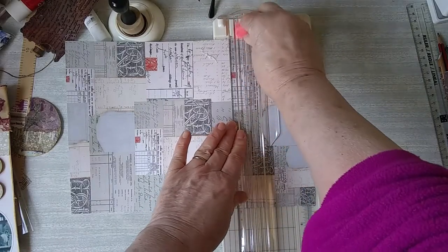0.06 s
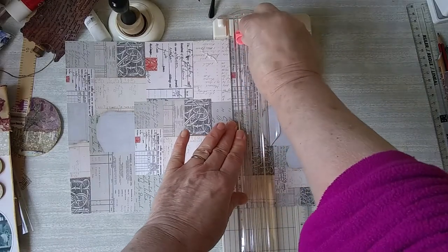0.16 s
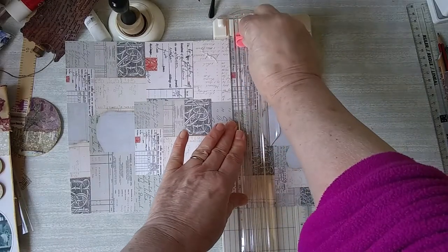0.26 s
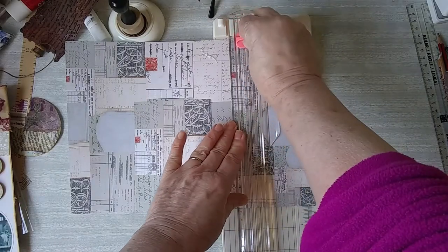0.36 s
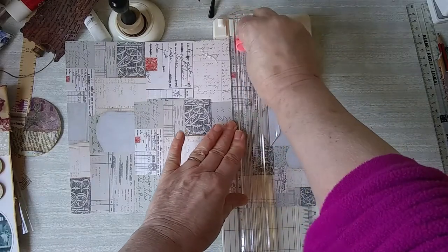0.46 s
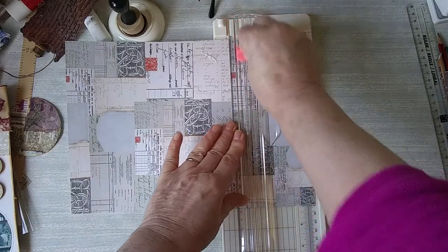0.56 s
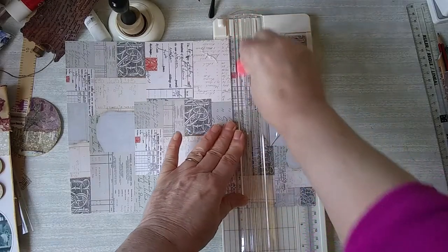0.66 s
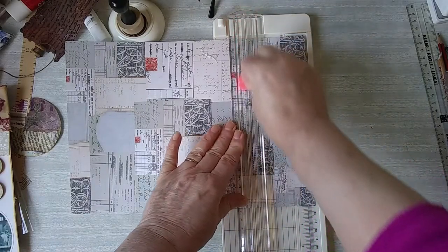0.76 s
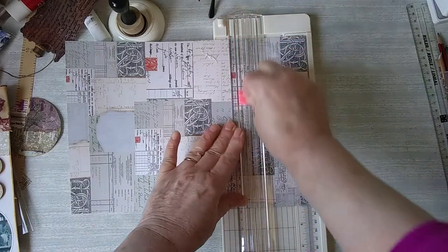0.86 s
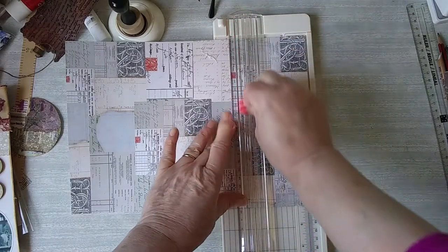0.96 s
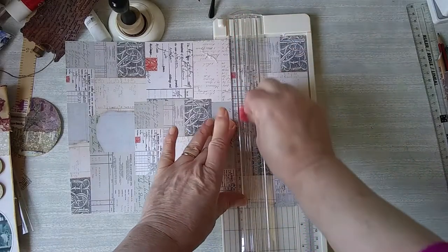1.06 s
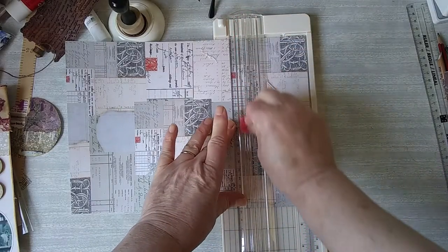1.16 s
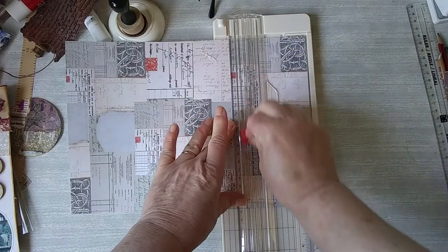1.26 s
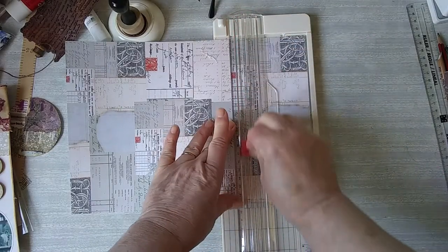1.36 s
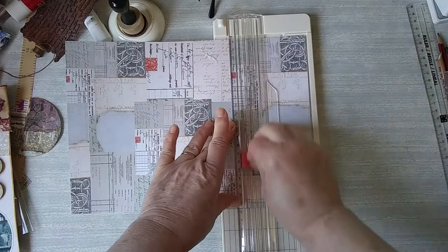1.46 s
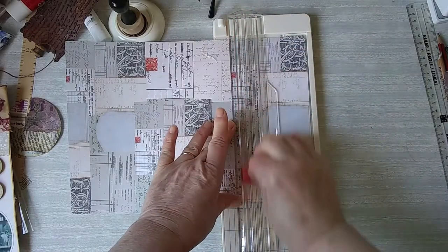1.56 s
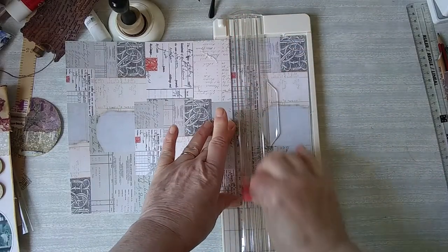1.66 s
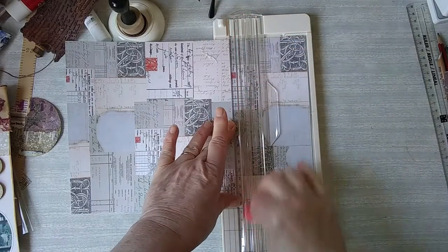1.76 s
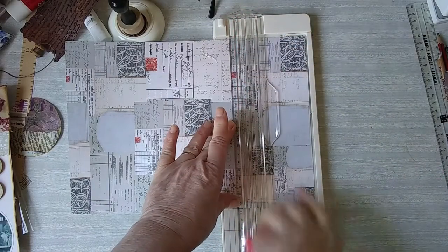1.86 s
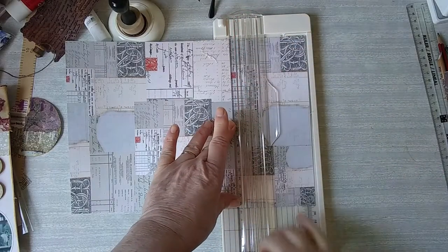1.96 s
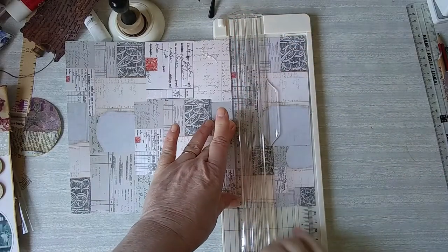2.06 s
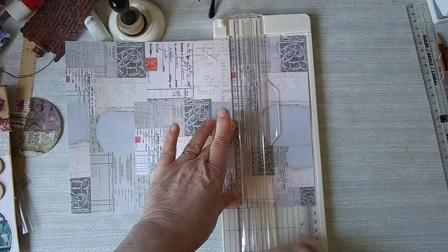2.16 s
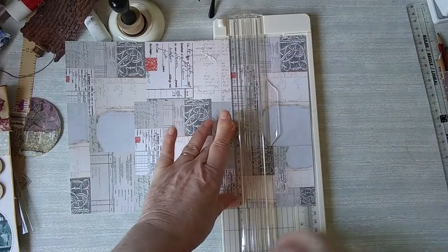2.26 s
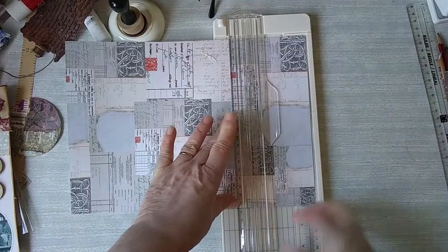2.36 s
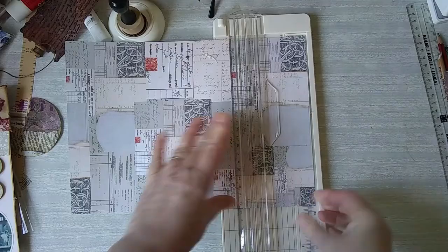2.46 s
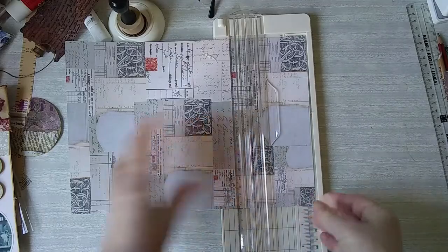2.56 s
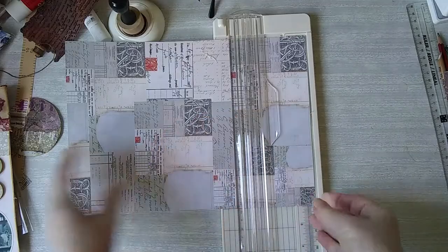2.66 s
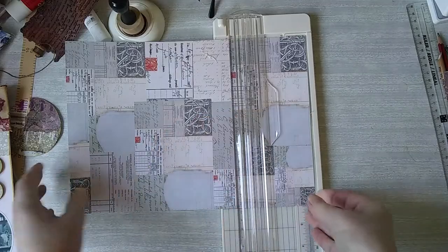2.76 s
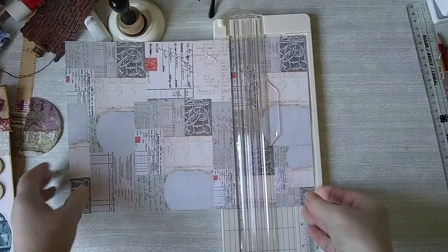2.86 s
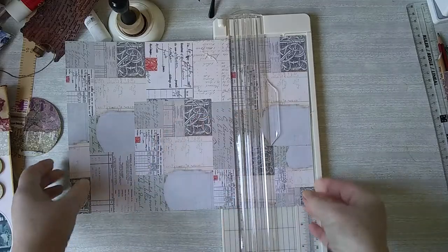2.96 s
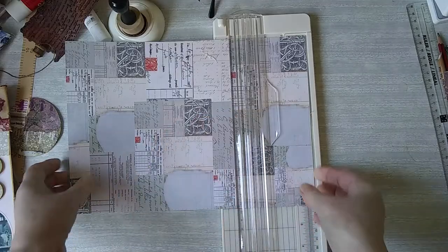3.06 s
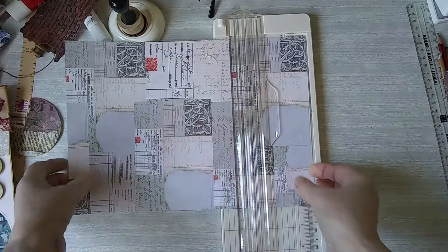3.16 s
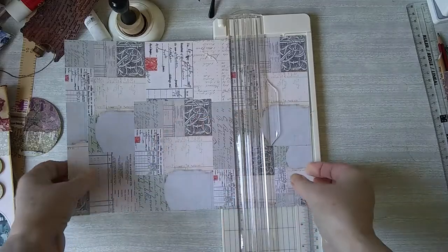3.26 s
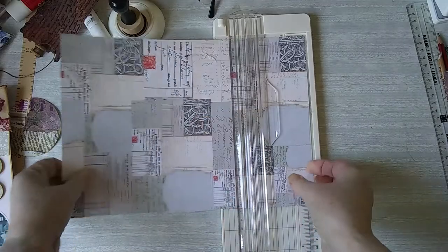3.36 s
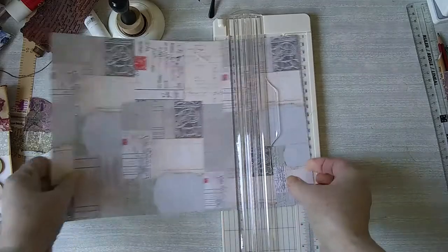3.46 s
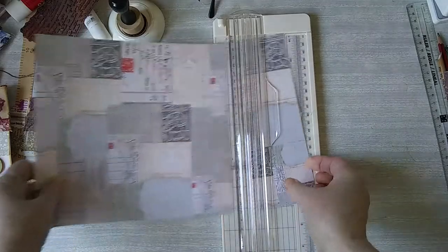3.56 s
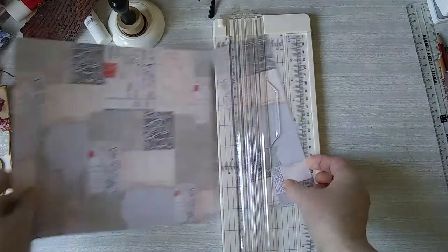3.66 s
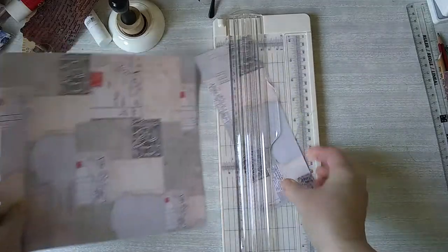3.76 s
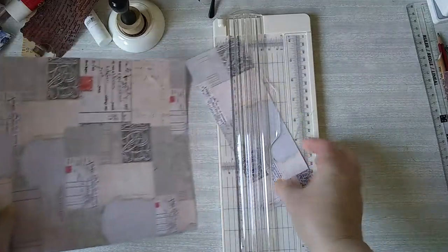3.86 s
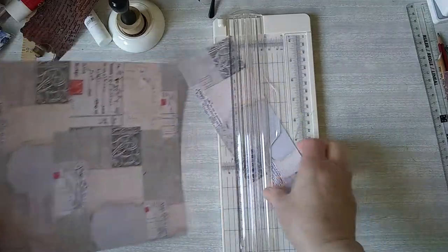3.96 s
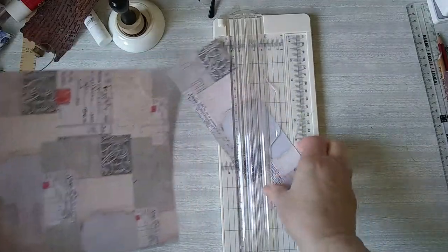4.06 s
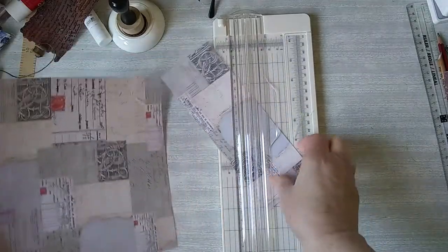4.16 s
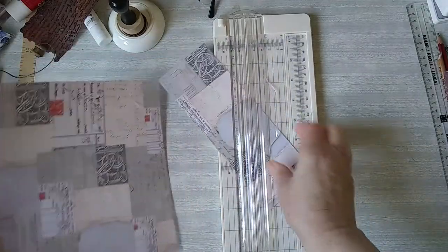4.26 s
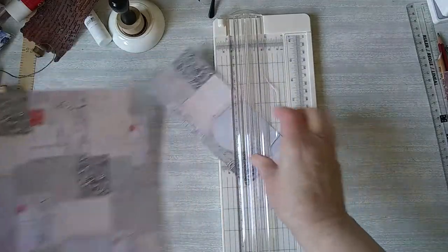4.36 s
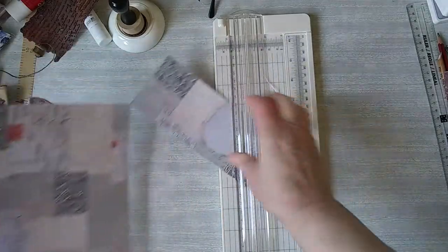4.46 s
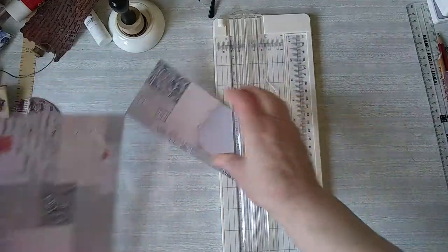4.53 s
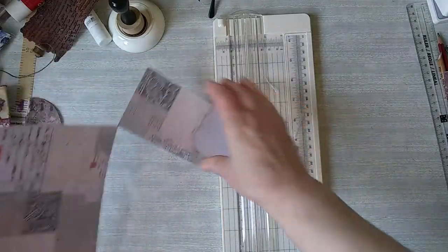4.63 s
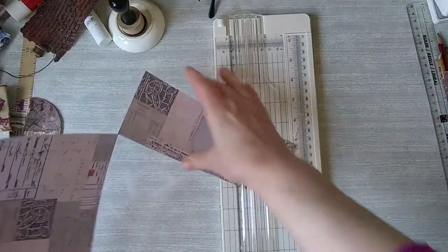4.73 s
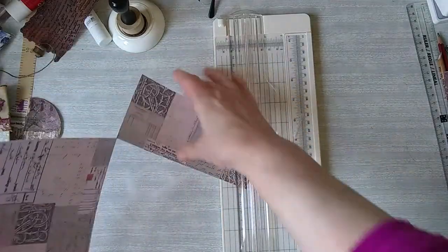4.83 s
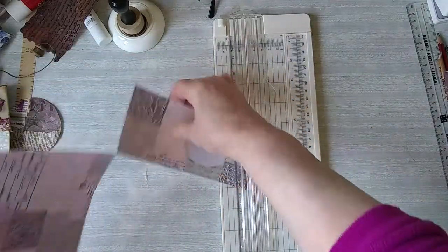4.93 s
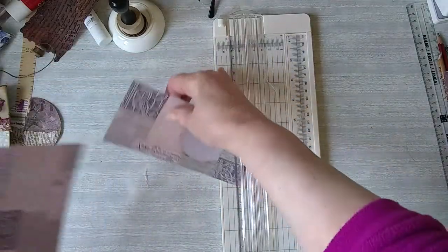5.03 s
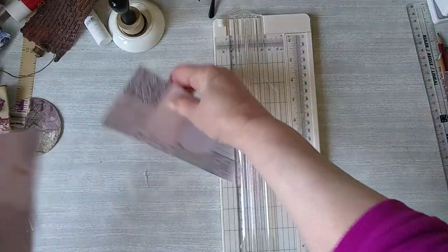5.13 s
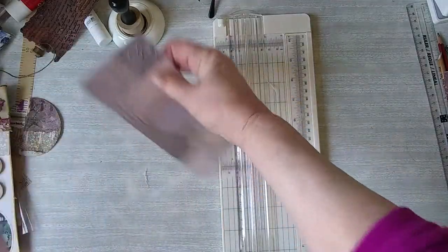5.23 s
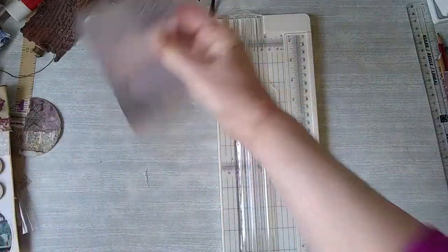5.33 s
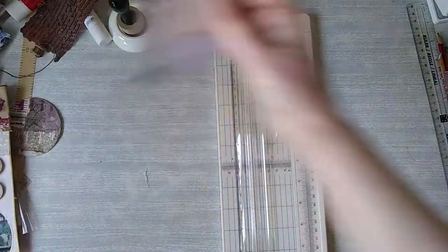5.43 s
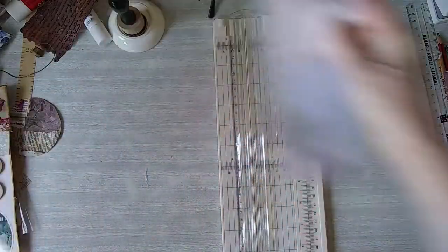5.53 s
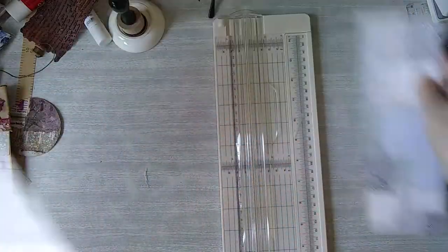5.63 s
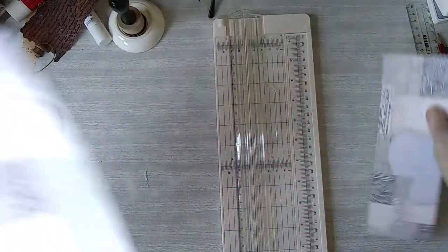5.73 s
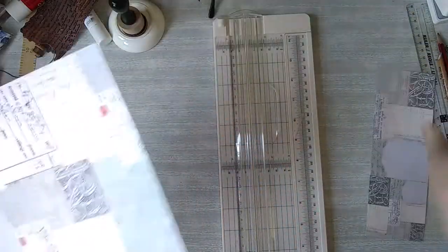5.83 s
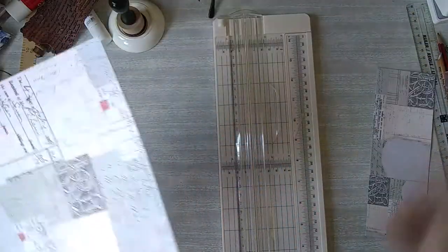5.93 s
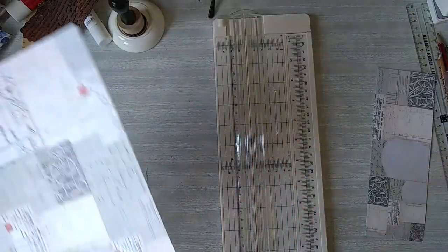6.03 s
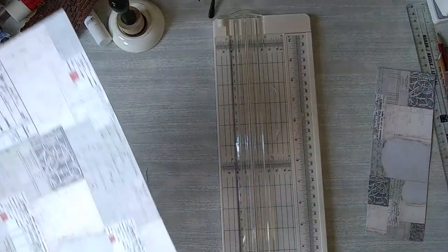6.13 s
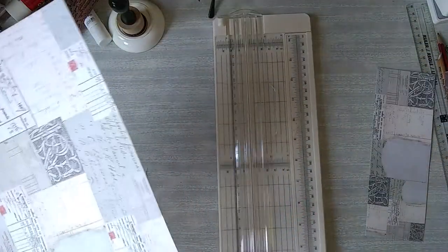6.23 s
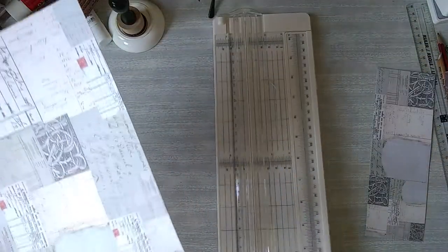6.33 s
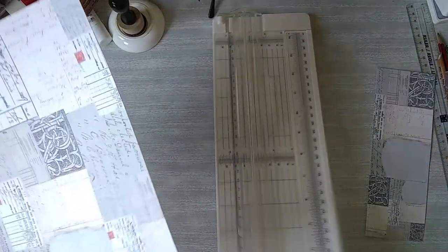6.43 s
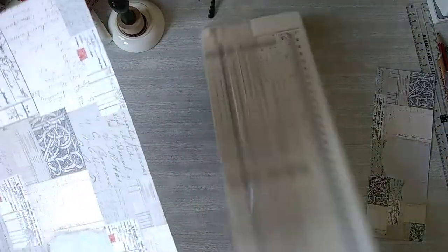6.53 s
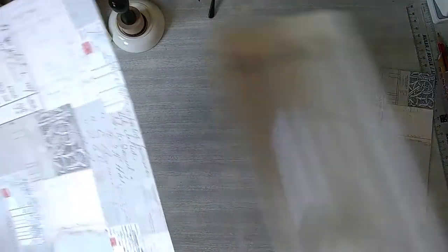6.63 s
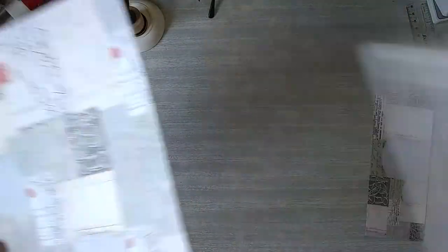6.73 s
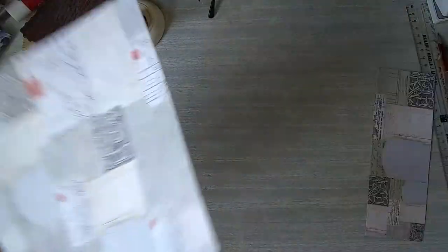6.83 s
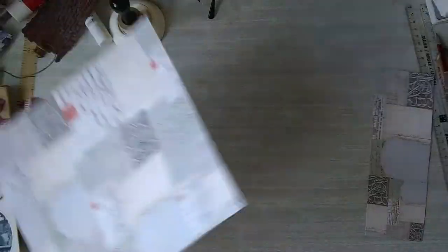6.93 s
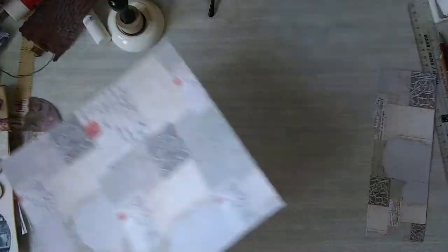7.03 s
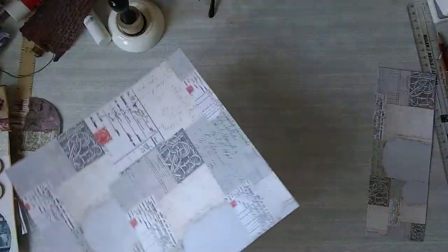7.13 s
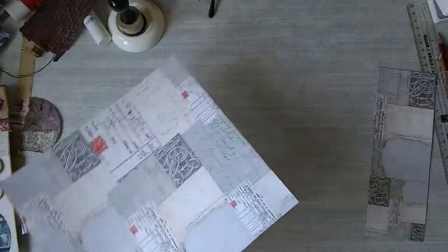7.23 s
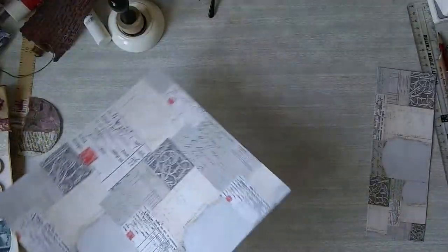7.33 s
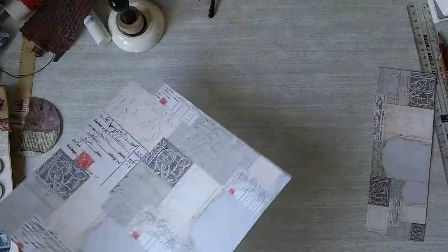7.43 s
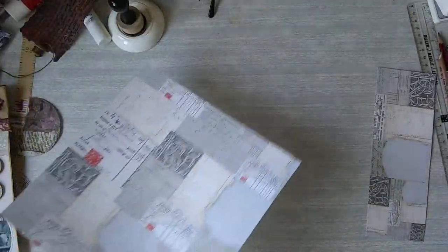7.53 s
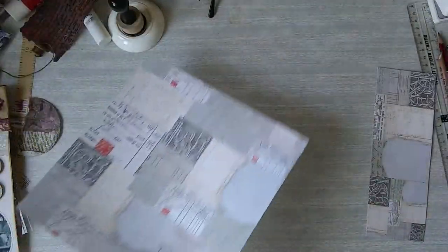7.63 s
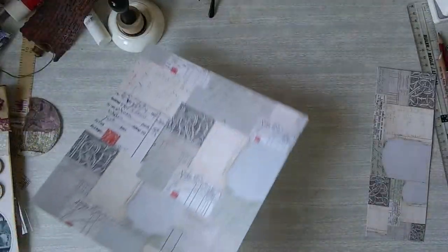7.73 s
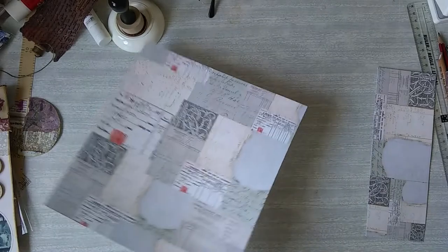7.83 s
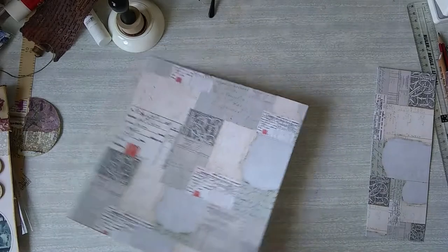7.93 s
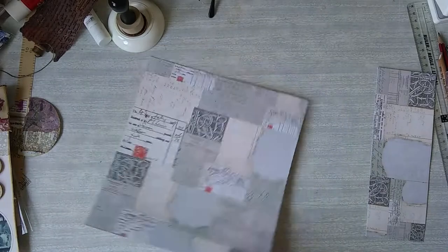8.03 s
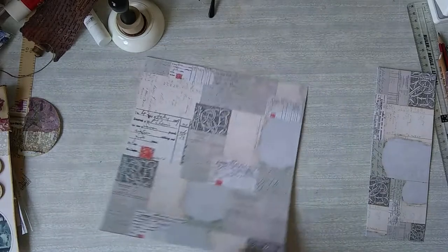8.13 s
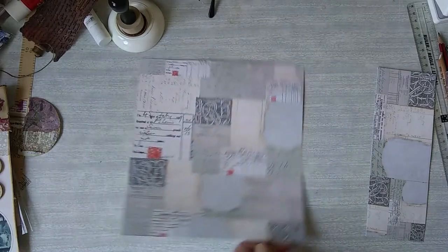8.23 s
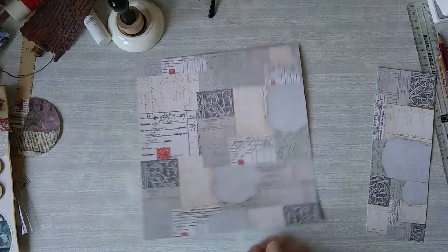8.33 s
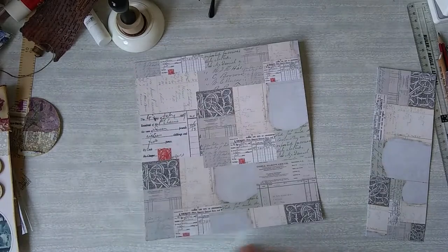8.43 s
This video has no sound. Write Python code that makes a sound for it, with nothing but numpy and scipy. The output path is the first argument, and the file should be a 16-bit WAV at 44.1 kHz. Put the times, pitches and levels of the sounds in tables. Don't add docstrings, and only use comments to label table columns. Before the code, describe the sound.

Long crisp paper cut on a plastic trimmer, a quiet pause with small taps, then swishing sheets, a sharp clap, hard desk knocks and soft paper flexing.

```python
import sys
import numpy as np
from scipy import signal
from scipy.fft import rfft, irfft, next_fast_len
from scipy.io import wavfile
from scipy.ndimage import uniform_filter1d

SR = 44100
rng = np.random.default_rng(int(sys.argv[2]) if len(sys.argv) > 2 else 0)


def to_wav(s):
    ch = np.atleast_2d(s).T
    pcm = np.round(np.clip(ch, -1, 1) * 32767)
    wavfile.write(sys.argv[1], SR, pcm.astype(np.int16))


def ratio_of_db(decibels):
    return 10 ** (np.asarray(decibels, float) / 20)


N = 374409
FRAME, OVERLAP = 1024, 768

# [t/s, shear hiss level/dB]
STROKE = [
    (0.405, -71),
    (0.44, -55.5),
    (0.6, -44),
    (0.85, -46),
    (1.05, -47.5),
    (1.2, -44.5),
    (1.42, -45),
    (1.781, -42),
    (1.802, -67),
]
# [f/Hz, density/dB per Hz]
SHEAR = [(40, -20), (80, -15), (150, -3), (280, -8.5), (500, -6.5), (800, -7.5), (1200, -11), (1900, -5.5),
         (3000, -6.5), (4500, -4.5), (6500, -5.5), (9500, -6.5), (12500, -9.5), (14000, -15.5)]
# [f/Hz, width/Hz, level/dB]
STOPS = [
    [(800, 69, 2.5), (1160, 100, -7), (3500, 150, -14), (4320, 39, -31), (5420, 160, -16), (7190, 55, -19),
     (7790, 42, -19), (8260, 96, -22)],
    [(851, 110, 1.5), (1200, 36, 3), (3270, 62, -16), (3690, 57, -16), (4910, 53, -17), (5640, 64, -16),
     (7280, 75, -10), (8930, 47, -15)],
    [(694, 78, 2.5), (1200, 42, 2.5), (1800, 190, -6), (3150, 46, -15), (5030, 59, -10), (5500, 370, -6.5),
     (6840, 79, -11), (7940, 35, -18)],
    [(668, 83, 0), (1140, 70, -4), (1600, 79, -2.5), (2860, 84, -5), (3490, 55, -3), (5210, 150, -11.5),
     (6870, 82, -9), (7480, 110, -19)],
    [(392, 47, -2), (1670, 260, -2.5), (2850, 38, -1), (3560, 250, -2), (5100, 320, -12), (5950, 32, -10),
     (7640, 56, -11), (8170, 120, -15)],
    [(860, 39.2, -6.5), (1740, 120, -1), (2890, 40, -1.5), (3080, 28, -10), (3580, 75, -3),
     (5250, 79, -4.5), (5800, 280, -7), (8050, 61, -11)],
    [(1145, 67, 4), (2360, 26, -26), (3180, 140, -4), (3700, 60, -5), (4070, 160, -1), (5600, 84, -4),
     (6330, 65, -10), (8740, 98, -13)],
    [(434, 30, -2), (1155, 54, 3), (1580, 62, -0.5), (3500, 45, -8), (3900, 100, -2.5), (4870, 50, -14),
     (5450, 42, -7), (7710, 38, -1)],
]
BLADE_PASSES = [.48, .61, .78, 1.0, 1.25, 1.46, 1.62, 1.74]
# [f/Hz, width/Hz, level/dB]
BASE_BENDING = [(437, 25, 1), (300, 28, -5)]
# [f/Hz, width/Hz, level/dB]
DESK_TOP = [(129, 35, -7.5), (159.2, 9.7, -7.5)]
RUMBLE_DB, RUMBLE_FOLLOWS = -40.5, 0.52
RUMBLE_SAG_DB_PER_S = 3.5
RAIL_DB = -4

# [f/Hz, density/dB per Hz]
PAPER = [(40, -11.4), (80, -17), (150, 3), (280, 0.5), (500, -2.5), (800, 2.5), (1200, 3.5), (1900, 2),
         (3000, -5), (4500, -4.5), (6500, -9), (9500, -10.5), (12500, -12.5), (14000, -20)]
# [f/Hz, width/Hz, level/dB]
UNDER_SHEET = [(446, 112, 14), (714, 200, 7), (2750, 200, 0), (3150, 700, 0), (5360, 82, -29.5)]
# [fastest t/s, speed-up/s, slow-down/s, hiss level/dB, rumble above hiss/dB]
SLIDES = [(3.44, 0.037, 0.3, -48, 1.5), (3.66, 0.32, 0.28, -42.5, -1.5), (3.82, 0.13, 0.12, -47.5, 1),
          (3.95, .03, 0.082, -53, 3), (4.02, 0.21, 0.3, -50.5, 6.5), (4.34, 0.1, 0.13, -61, 14.5),
          (4.42, 0.16, 0.26, -49.5, -0.5), (5.145, 0.054, 0.18, -35, -9), (5.215, 0.098, 0.087, -33, -9),
          (5.83, 0.025, 0.098, -46.5, 0.5), (7.52, 0.091, 0.12, -54.5, -1), (7.72, 0.1, 0.24, -47, -8.5),
          (7.97, 0.2, 0.27, -56, -3), (8.23, 0.093, 0.12, -52.5, -27), (8.32, 0.032, 0.072, -55, -24)]
# [fastest t/s, speed-up/s, slow-down/s, hiss level/dB, rumble above hiss/dB]
RUBS = [(0.23, 0.044, 0.11, -50.5, 4.5), (0.36, 0.045, 0.29, -53, 5), (4.6, 0.17, 0.13, -51.5, 4),
        (4.73, 0.038, 0.067, -59, 6.5), (4.87, 0.026, 0.29, -60.5, 8.5), (4.98, 0.15, 0.12, -44, -10),
        (4.982, .02, 0.021, -37, -9), (3.115, .02, 0.099, -63, -3), (5.06, 0.088, 0.33, -49, -3.5),
        (5.27, 0.061, 0.096, -54, 16.5), (5.46, 0.078, 0.073, -52.5, -2), (8.4, 0.064, 0.54, -59.5, -13)]
# [fastest t/s, speed-up/s, slow-down/s, hiss level/dB, rumble above hiss/dB]
SHIFTS = [(1.82, 0.1, 0.41, -62.5, 2.3), (2.78, 0.25, 0.084, -78, 19.6), (3.13, 0.18, 0.16, -67.5, 15),
          (2.13, 0.13, 0.061, -73, 16.5), (6.65, .1, 0.081, -71, 14), (4.2, .1, 0.5, -87, 14),
          (5.797, 0.033, 0.033, -51, 11), (6.215, 0.02, 0.052, -58.5, 27), (6.33, 0.1, 0.17, -59, 23),
          (6.475, 0.13, 0.054, -58.5, 13.4), (6.9, 0.74, 0.51, -64, 11.3), (7.3, 0.25, 0.23, -65, 6)]
GRIT_DB = {"slide": -2, "rub": -10.5, "shift": -3}
FADE_DB, FADE_CURVE = 29.5, 1.514
DESK_FOLLOWS = 0.72

# [t/s, peak level/dB, main ring f/Hz, rail click above ring/dB]
FLICKS = [(2.135, -42.5, 376, -41), (2.643, -42, 850, -26), (2.771, -40.5, 1380, -27),
          (2.784, -44, 328, -18), (3.293, -41, 810, -11.5), (3.337, -36, 644, -12), (3.411, -42, 930, -7),
          (3.429, -32, 860, -23), (3.664, -31, 394, -14), (3.734, -36, 427, -1), (3.985, -30, 894, -24),
          (4.862, -40.5, 890, -7.5), (4.976, -32, 585, -8), (5.003, -29.5, 396, -20),
          (5.264, -21, 786, -15), (5.283, -34, 814, -25), (5.298, -26.5, 782, -30), (5.55, -44.5, 345, -30),
          (5.758, -39.5, 744, -13.5), (5.845, -37.5, 1135, -7), (6.427, -32.5, 1020, -30),
          (6.468, -29, 930, -15.5), (6.558, -42, 735, -23), (6.913, -49.5, 825, 1),
          (6.963, -51.5, 920, 8.5), (7.286, -44.5, 332, -25), (7.486, -59, 713, -7), (8.36, -41, 444, -10),
          (8.384, -42.5, 440, -9)]
# [t/s, peak level/dB, main ring f/Hz, rail click above ring/dB]
TAPS = [(0.21, -41, 785, -13), (0.254, -40, 764, -15), (0.339, -46.5, 790, 0), (1.959, -57, 720, 12),
        (2.015, -61, 713, 8), (2.384, -41.5, 970, -16), (2.904, -40.5, 248, -23), (3.107, -41.5, 1070, -27),
        (4.154, -37, 870, -3), (5.224, -22.5, 917, -6.5), (5.23, -18, 800, -23), (5.801, -28.5, 1096, 1.5),
        (5.794, -41.5, 1160, -1), (6.191, -31.5, 390, -4.5), (6.285, -29.5, 1020, 1),
        (6.327, -22, 856, -30), (6.343, -27, 1090, -19), (6.42, -30, 910, -24)]
# [t/s, peak level/dB, main ring f/Hz, rail click above ring/dB]
KNOCKS = [
    (3.116, -45.5, 840, -6),
    (5.259, -26.5, 1100, -3),
    (6.213, -24.5, 900, -25),
    (6.231, -24, 950, -18),
    (6.292, -24, 1140, -10),
    (6.303, -29, 695, -6),
    (6.31, -23.5, 1180, -6),
    (6.3162, -14, 997, -5.5),
    (6.977, -39, 787, -4),
    (6.198, -24, 806, -19),
]
# [t/s, peak level/dB, main ring f/Hz, rail click above ring/dB]
NICKS = [(0.243, -37, 436, -25), (0.362, -50, 450, -20), (0.598, -32, 830, -25), (2.143, -41.5, 800, -27),
         (2.155, -52, 750, -25), (2.265, -54, 544, -25), (2.912, -46, 1100, -8), (2.925, -45, 300, -20),
         (7.70, -50, 700, 4), (7.735, -50, 700, 4), (7.76, -54, 700, 4), (3.612, -38, 810, -1),
         (3.648, -37, 850, -3), (3.685, -40, 800, 0), (3.762, -39.5, 800, 0), (3.932, -42, 643, -4),
         (3.973, -36, 600, -20), (4.033, -44, 800, -3), (4.105, -40, 786, -20), (4.317, -48, 791, -7),
         (4.901, -41, 894, -10), (5.374, -46, 840, -22), (5.441, -46, 907, -12), (6.453, -39, 895, -8),
         (6.497, -46, 800, -20), (6.617, -52, 471, -6), (6.655, -50, 400, -25), (6.766, -51, 764, -4),
         (6.834, -51, 433, -20), (6.87, -46, 790, -25), (6.945, -44, 450, -25), (7.014, -42, 500, -13),
         (7.475, -62, 1200, 8), (7.649, -54, 549, -5), (7.679, -46, 614, -6), (8.229, -45.5, 1480, -15),
         (8.309, -57, 900, 6)]
# [t/s, peak level/dB, main ring f/Hz, rail click above ring/dB]
CRACKS = [
    (5.8052, -17, 950, 0.5),
    (3.986, -35, 900, -11),
    (5.266, -23, 800, -12),
]
# [t/s, peak level/dB, main ring f/Hz, rail click above ring/dB]
THUMPS = [
    (6.3165, -8, 1900, -11),
    (6.229, -28.5, 940, -4.5),
    (6.327, -17, 900, -9),
    (6.341, -24, 1100, -8),
    (6.468, -32, 900, -10),
    (6.559, -42, 746, -20),
]
CONTACT = {"flick": (-0.95, 0.099, 0.0014), "tap": (-8, 0.09, 0.00022), "knock": (-28, 0.11, 0.00027),
           "nick": (-5, 0.071, 0.0014), "crack": (-5.5, .013, 0.00021), "thump": (-19, 0.027, 0.00046)}
# [f/Hz, level/dB, t60/s]
BOARD = [(304, 8.5, 0.094), (427, 6.5, 0.14), (897, -5, 0.12), (1220, -28, 0.12), (1905, -4.5, 0.24)]
# [f/Hz, level/dB, t60/s]
RAIL = [(3070, -47, 0.064), (3160, 2, 0.11), (3780, -17, 0.059), (6140, -4, 0.14)]

# [t/s, f/Hz, level/dB]
SQUEAK = [
    (2.65, 1389, -65),
    (2.752, 1415, -63),
    (2.788, 1367, -60),
    (2.81, 1376, -77),
]
# [t/s, peak level/dB, f/Hz]
FLEXES = [(1.847, -66, 116), (3.43, -66, 90), (3.62, -66, 90), (5.0, -66, 100), (5.868, -60, 104),
          (6.186, -49, 150), (7.039, -71, 124), (7.15, -67, 71), (7.207, -60, 106), (7.26, -57, 77.4),
          (7.378, -62, 115), (7.435, -57.5, 84.5), (7.476, -54, 112), (7.515, -58, 90), (7.79, -65.5, 100)]

# [f/Hz, t60/s]
WALLS = [(100, 0.18), (1000, 0.32), (4000, 0.22), (14000, 0.12)]
# [f/Hz, density/dB per Hz]
AIR = [(40, -5.5), (80, 0), (150, 3.5), (280, 3.5), (500, -1), (800, -8), (1200, -10), (1900, -12.5),
       (3000, -16.5), (4500, -16.5), (6500, -18), (9500, -21.5), (12500, -23), (14000, -25)]
AIR_DB = -56

# [f/Hz, likeness]
ALIKE = [(60, 0.35), (150, 1), (500, 0.72), (1400, 0.047), (2250, 0.075), (3500, 0.28), (6000, 0.032),
         (14000, 0.033)]
DIRECT = 0.8
WANDER_RAD = 2.5
# [f/Hz, level/dB]
SECOND_PORT = [(100, -1.5), (2500, 1.5), (5000, 2), (14000, 2.5)]
# [f/Hz, gain]
CROSS = [(100, 0.44), (2300, 0.62), (4500, 0.46), (7000, 0.14), (14000, 0.11)]
COMB_HZ, EDGE_HZ = 2250, 14250
UNDER_DB = 9.5


def blade():
    s, db = np.transpose(STROKE)
    time = np.arange(s[0], s[-1], 1 / SR)
    level_db, size = np.interp(time, s, db), len(time)
    hz, t, z = fibres(size, per_s=4000, spread_db=2.6, smooth=2.2)

    near = [np.interp(t + s[0], BLADE_PASSES, row) for row in np.eye(len(STOPS))]
    ring = sum(share * humps(peaks, hz) for share, peaks in zip(near, STOPS))
    ring = ring + ratio_of_db(4.0) * humps(DESK_TOP, hz) + humps(BASE_BENDING, hz)
    colour = ratio_of_db(read(SHEAR, hz))[:, None] * np.sqrt(1 + ratio_of_db(22.5) * ring)
    z = z * colour * patchy(z.shape[1:], 1.5)

    hiss = band(z, hz, 4800, 17000, size)
    rail = band(z, hz, 2840, 4400, size)
    rumble = band(z, hz, 60, 2080, size)
    boom_db = RUMBLE_DB + RUMBLE_FOLLOWS * (level_db - db.max())
    boom_db = boom_db - RUMBLE_SAG_DB_PER_S * (time - s[0])
    sound = ratio_of_db(level_db) * (ratio_of_db(2.0) * hiss + ratio_of_db(RAIL_DB) * rail) + ratio_of_db(boom_db + 3.5) * rumble
    return s[0], sound * signal.windows.tukey(size, .008)


def paper():
    power = drag(SLIDES, GRIT_DB["slide"]) + drag(RUBS, GRIT_DB["rub"]) + drag(SHIFTS, GRIT_DB["shift"])
    gains = [np.interp(np.arange(N) / 128, np.arange(len(p)), np.sqrt(p)) for p in power]
    hz, t, z = fibres(N, per_s=2500, spread_db=3.2, smooth=2.0)
    z = z * ratio_of_db(read(PAPER, hz))[:, None] * np.sqrt(1 + ratio_of_db(11.0) * humps(UNDER_SHEET + DESK_TOP, hz))
    fine = z * patchy(z.shape[1:], 1.4)
    lumpy = z * patchy(z.shape[1:], 2.5)
    hiss = band(fine, hz, 2100, 6500, N)
    grit = band(fine, hz, 6500, 15000, N)
    rumble = band(lumpy, hz, 160, 1750, N)
    return ratio_of_db(-2.2) * gains[0] * hiss + ratio_of_db(3.5) * gains[1] * grit + ratio_of_db(-2.5) * gains[2] * rumble


def drag(rows, grit_db):
    t, power = np.arange(0, N + 128, 128) / SR, 0
    for s, rise, fall, db, rumble_db in rows:
        pace = abs(t - s) / np.where(t < s, abs(rise), abs(fall))
        fade_db = -FADE_DB * pace ** FADE_CURVE
        hiss_db = db + fade_db
        rumble_level_db = db + rumble_db + DESK_FOLLOWS * fade_db
        power = power + ratio_of_db([hiss_db, db + grit_db + fade_db, rumble_level_db]) ** 2
    return power


def fibres(size, per_s, spread_db, smooth):
    snaps = ratio_of_db(spread_db * np.minimum(rng.exponential(1, size), 3.5)) * (rng.random(size) < per_s / SR)
    rub = rng.standard_normal((3, size))
    drive = evened(snaps * rub[0]) + smooth * rub[1:]
    hz, t, z = signal.stft(drive, SR, nperseg=FRAME, noverlap=OVERLAP)
    other = z[1] * np.exp(2j * np.pi * rng.random(len(hz)))[:, None]

    wander = uniform_filter1d(uniform_filter1d(other.real, size=21, axis=0), size=25, axis=1)
    spread = uniform_filter1d(wander ** 2, size=200, axis=1).mean(1, keepdims=True)
    wander = wander / np.sqrt(spread + 1e-20)
    path = np.exp(1j * WANDER_RAD * wander)
    direct = DIRECT / (1 + (5500 / (hz[:, None] + 1)) ** 2)
    unlike = direct * path * z[0] + np.sqrt(1 - direct ** 2) * other
    alike = np.clip(read(ALIKE, hz), 0, 1)[:, None]
    return hz, t, np.array([z[0], alike * z[0] + np.sqrt(1 - alike ** 2) * unlike])


def tap(s, db, hz, click_db, tick_db, t60, rise):
    t = np.arange(4800) / SR
    turn = rng.random((len(BOARD) + len(RAIL), 3))
    heavy = min(t60 / .06, 1)
    noise = rng.standard_normal((2, len(t)))
    noise[1] = 0.14 * noise[0] + .5 * noise[1]
    spectrum = rfft(noise)
    f = np.fft.rfftfreq(len(t), 1 / SR)

    spot = np.sin(2 * np.pi * hz * t) * ratio_of_db(-60 * t / (.5 * t60))
    board = rings(BOARD, t, t60, turn)
    desk = sum(ratio_of_db(d - 46 * width * t) * np.sin(2 * np.pi * mode * t) for mode, width, d in DESK_TOP)
    desk = desk * (1 - np.exp(-t / 0.0035))
    low_cut = f ** 2 / (f ** 2 + (200 / heavy) ** 2)
    thud = evened(irfft(spectrum * low_cut / (1 + ((f - hz) / 1100.0) ** 2))) * ratio_of_db(-60 * t / t60)
    body = 0.89 * spot + 0.27 * heavy * board + 0.39 * thud + 0.34 * heavy * desk

    first = .9 * ratio_of_db(-60 * t / .007)
    snap = first + 1.25 * ratio_of_db(-60 * t / (0.39 * t60))
    click = evened(irfft(spectrum / (1 + ((f - 3300) / 2100.0) ** 4))) * snap
    click = click + 0.57 * rings(RAIL, t, .5 * t60, turn[::-1])
    tick = evened(irfft(spectrum / (1 + (5500 / (f + 1)) ** 4) / (1 + (f / 9500) ** 2))) * snap
    edge = ratio_of_db(click_db - 1.0) * click + ratio_of_db(tick_db + 1.5) * tick
    return s + .002, ratio_of_db(db - 2.0) * (body + edge) * (1 - np.exp(-t / rise))


def rings(modes, t, t60, turn):
    total = 0
    for (hz, db, ring), (weaker, detune, phase) in zip(modes, turn):
        fade = ratio_of_db(db - 9.8 * weaker - 60 * t / min(ring, t60))
        total = total + fade * np.sin(2 * np.pi * (hz * (.95 + 0.082 * detune) * t + phase))
    return total


def squeak():
    s, hz, db = np.transpose(SQUEAK)
    t = np.arange(s[0], s[-1], 1 / SR)
    waver = 1 + 0.46 * evened(uniform_filter1d(rng.standard_normal(len(t)), size=200))
    turns = np.cumsum(np.interp(t, s, hz)) / SR
    tone = np.sin(2 * np.pi * turns) * waver * signal.windows.tukey(len(t), .2)
    return s[0], ratio_of_db(np.interp(t, s, db) + 1.5) * tone * np.array([[1], [.8]])


def flex(s, db, hz):
    t = np.arange(0, .07, 1 / SR)
    turns = hz * t * (1.25 - 3.5 * t)
    push = np.sin(2 * np.pi * turns)
    push = push + 0.42 * np.sin(2 * np.pi * 1.6 * turns) + .5 * np.sin(2 * np.pi * 0.56 * turns)
    return s, ratio_of_db(db + 12) * np.array([[1], [.05]]) * push * np.hanning(len(t))


def walls(x):
    taps = np.zeros((2, SR // 2))
    slots = np.arange(160, SR // 2 - 20, 20)
    at = slots + rng.integers(0, 20, (2, len(slots)))
    np.put_along_axis(taps, at, rng.choice([-1., 1.], at.shape), 1)
    hz, t, z = signal.stft(taps, SR, nperseg=256)
    tail = signal.istft(z * ratio_of_db(-60 * t / read(WALLS, hz)[:, None]), SR, nperseg=256)[1]
    return signal.fftconvolve(x, tail / np.linalg.norm(tail[0]), axes=1)[:, :N]


def air():
    hz, t, z = signal.stft(rng.standard_normal((2, N)), SR, nperseg=FRAME, noverlap=OVERLAP)
    z = z * ratio_of_db(read(AIR, hz))[:, None] * patchy(z.shape[1:], 0.52)
    return ratio_of_db(AIR_DB) * band(z, hz, 25, 18000, N)


def evened(x):
    return x / np.sqrt(np.mean(x ** 2) + 1e-20)


def read(points, hz):
    f, value = np.transpose(points)
    return np.interp(np.log(hz + 1), np.log(f + 1), value)


def humps(peaks, hz):
    return sum(ratio_of_db(db) ** 2 / (1 + (2 * (hz - f) / width) ** 2) for f, width, db in peaks)[:, None]


def patchy(shape, db):
    field = rng.standard_normal(shape[::-1]).T
    field = uniform_filter1d(uniform_filter1d(field, size=7, axis=0), size=8, axis=1)
    return ratio_of_db(db * evened(field))


def band(z, hz, lo_hz, hi_hz, size):
    gate = 1 / np.sqrt((1 + (lo_hz / (hz + 1)) ** 6) * (1 + (hz / hi_hz) ** 6))
    return evened(signal.istft(z * gate[:, None], SR, nperseg=FRAME, noverlap=OVERLAP)[1][:, :size])


def add(mix, s, sound):
    part = mix[:, max(round(s * SR), 0):][:, :sound.shape[1]]
    part += sound[:, :part.shape[1]]


def scene():
    desk = paper()
    add(desk, *blade())
    add(desk, *squeak())
    contacts = {"flick": FLICKS, "tap": TAPS, "knock": KNOCKS, "nick": NICKS, "crack": CRACKS, "thump": THUMPS}
    for kind, rows in contacts.items():
        tick_db, t60, rise = CONTACT[kind]
        for s, db, hz, click_db in rows:
            add(desk, *tap(s, db, hz, click_db, click_db + tick_db, t60, rise))
    desk = signal.sosfilt(signal.butter(2, 70, "high", fs=SR, output="sos"), desk)
    for row in FLEXES:
        add(desk, *flex(*row))
    return desk + ratio_of_db(-13.0) * walls(desk) + air()


def thinned(pair, under_db):
    z = signal.stft([pair[0] + pair[1], pair[0] - pair[1]], nperseg=FRAME)[2]
    power = uniform_filter1d(uniform_filter1d(abs(z) ** 2, size=4, axis=1), size=3, axis=2)
    level_db = 10 * np.log10(abs(power) + 1e-20)
    keep = np.clip((level_db - level_db[::-1] + under_db) / 0.97, .03, 1)
    keep[:, :12] = 1
    total, gap = signal.istft(z * keep, nperseg=FRAME)[1][:, :N] / 2
    return np.array([total + gap, total - gap])


def band_limit(x):
    return signal.sosfilt(signal.butter(12, 15100, fs=SR, output="sos"), x)


def record(dry):
    size = next_fast_len(N)
    hz = np.fft.rfftfreq(size, 1 / SR)
    first, second = rfft(dry, size) * [np.ones(len(hz)), ratio_of_db(read(SECOND_PORT, hz))]
    late = np.clip(read(CROSS, hz), 0, .99) * np.exp(-2j * np.pi * hz / COMB_HZ)
    wide = np.array([first - late * second, second - late * first])
    wide = wide / np.sqrt(1 + (hz / EDGE_HZ) ** 200)
    mix = thinned(irfft(wide, size)[:, :N], UNDER_DB) * ratio_of_db([[-2.5], [-2.]])
    return band_limit(mix)


dry = scene()
out = record(dry)
to_wav(out)
```